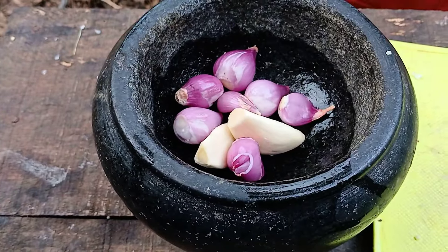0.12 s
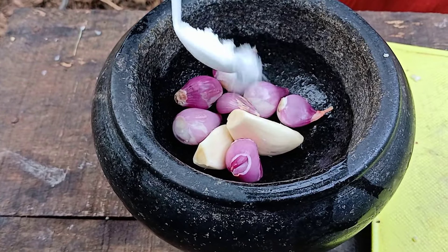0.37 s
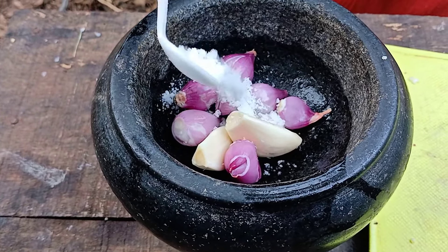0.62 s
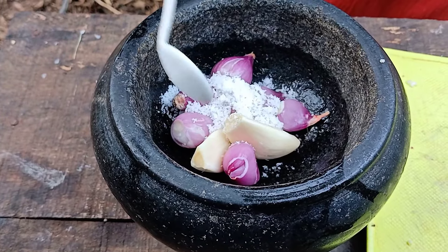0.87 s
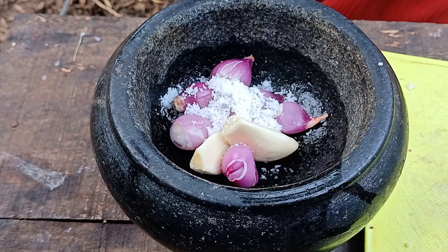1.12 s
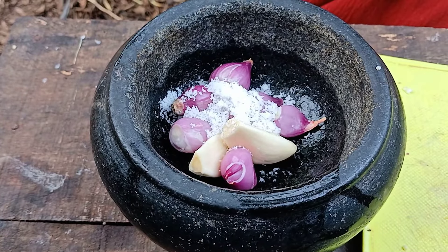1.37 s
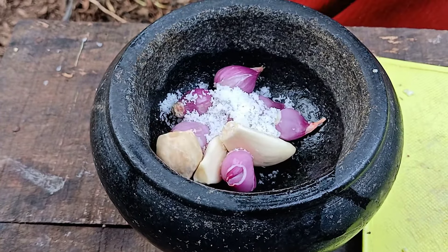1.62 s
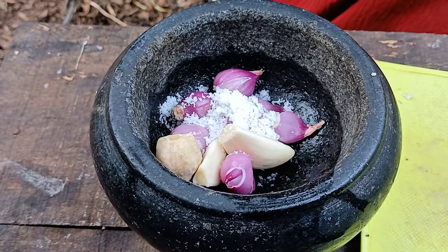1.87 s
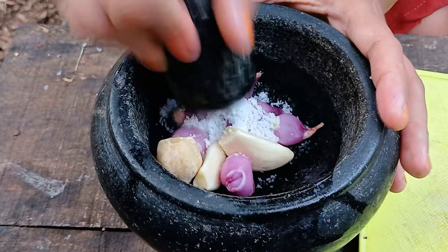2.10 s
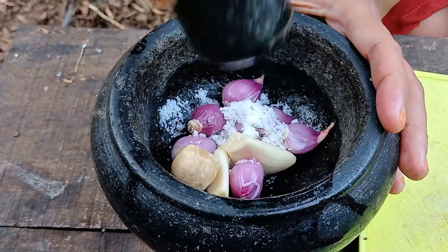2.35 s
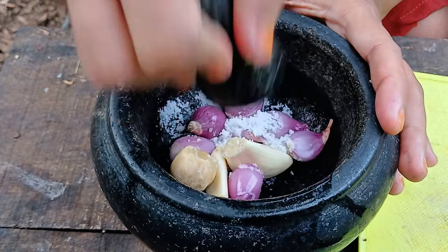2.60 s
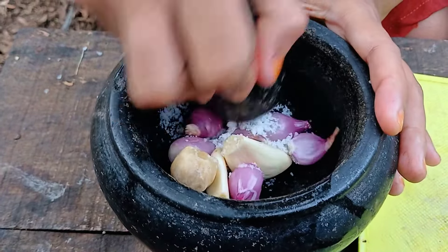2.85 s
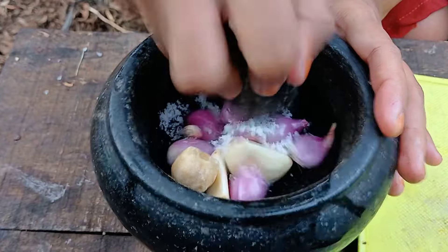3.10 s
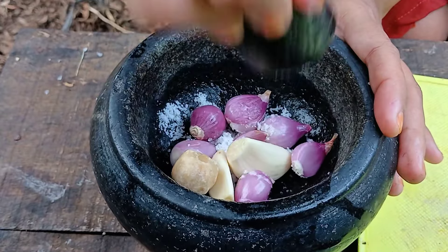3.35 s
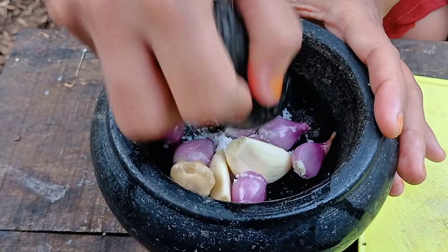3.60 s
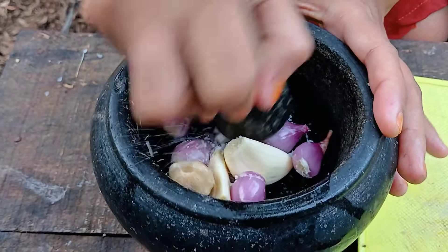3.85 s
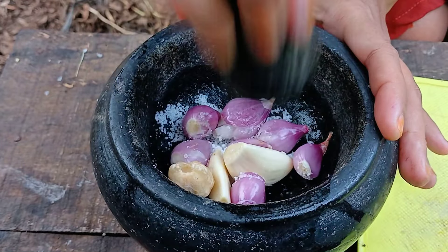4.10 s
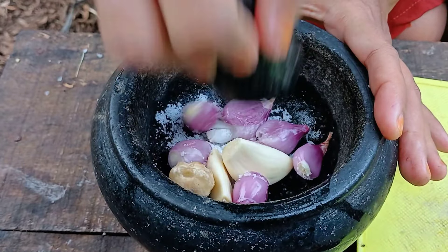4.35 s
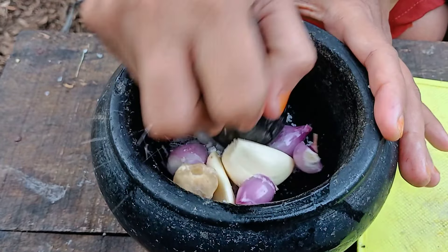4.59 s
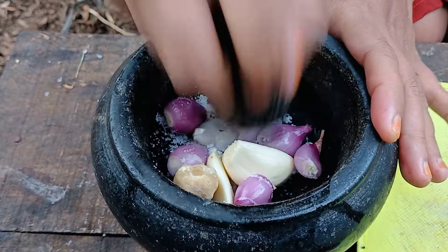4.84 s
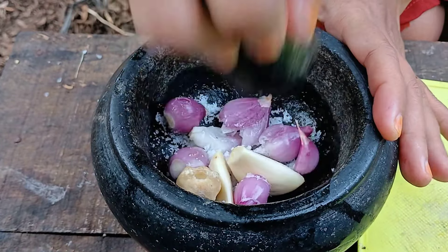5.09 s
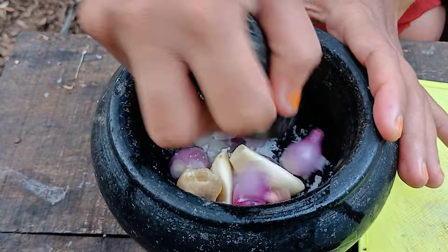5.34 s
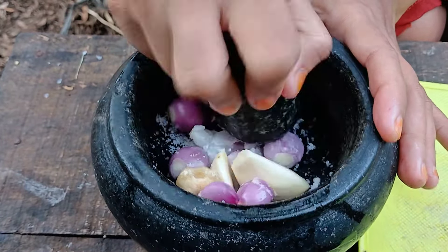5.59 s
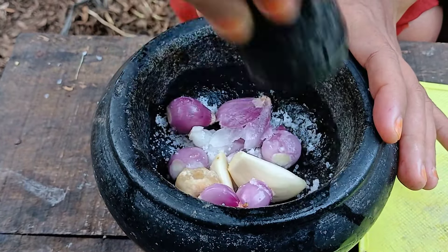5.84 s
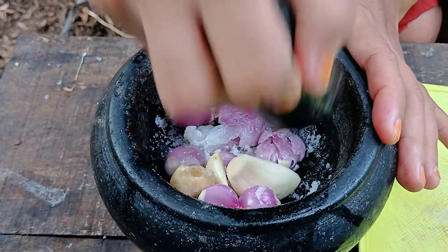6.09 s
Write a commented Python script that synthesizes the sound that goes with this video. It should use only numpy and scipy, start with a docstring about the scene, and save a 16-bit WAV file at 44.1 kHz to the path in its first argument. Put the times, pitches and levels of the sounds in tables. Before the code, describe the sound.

A close, dry outdoor scene with thin high insect trills, soft hiss and a distant low rumble with a faint engine drone. A tiny rustle dies away at the very start. Around 0.4 and 0.65 s fine salt patters softly off a spoon. At 1.23 s a nut knocks hollowly into the stone bowl, and again at 1.4 s, ending abruptly. From 2.1 s a stone pestle pounds steadily, twelve blows about 0.35 s apart, until the end near 6.2 s. Most combine a short bright crunch of salt with a heavy, quickly damped wooden thud and rebound, then small uneven ticks, clacks and knocks. The blow at 3.1 s strikes bare stone with a sharp, brief clink. A hoarse bird whistle, scooping up and sagging, is clearest around 3.3 s, with fainter calls near 4.5, 5.5 and 5.9 s.

```python
"""A stone pestle pounds shallots, garlic and coarse salt in a stone mortar on a plank bench outdoors.
Each blow cracks salt (shaped noise), thuds the plank (force pulses into damped modes) and sets loose things
ticking (short noise bursts); one blow rings bare stone. Before that salt is spooned in and a nut is dropped
(modes and noise). Insects trill (noise bands), a bird calls hoarsely (gliding sine), a far rumble lies below."""
import sys
import numpy as np
from scipy import signal
from scipy.fft import rfft, irfft
from scipy.io import wavfile

SR = 44100
rng = np.random.default_rng(int(sys.argv[2]) if len(sys.argv) > 2 else 0)


def store_pcm(level_fs):
    """Save levels as 16-bit WAV."""
    pcm = np.round(np.clip(level_fs, -1, 1) * 32767).astype(np.int16)
    wavfile.write(sys.argv[1], SR, np.atleast_2d(pcm).T)


def rack_gain(trim_db):
    """Turn a fader trim in dB into the linear factor to multiply a signal by."""
    fader = np.asarray(trim_db, float)
    return 10 ** (fader / 20)


N = 273861

# pestle on salt: t/s, crunch level/dB, lower crunch level/dB, plank thud level/dB, contact/ms
BLOWS = [(2.1045, -31, -58, 10, 7.8), (2.4234, -19, -24.5, 9, 8.3), (2.7552, -14, -16, -6.4, 4.7),
         (3.0965, -45, -7, -6.5, 4.2), (3.4393, -23, -33, 7.5, 6.67), (3.7821, -18, -26, 10, 6.82),
         (4.1259, -16.5, -28, 8, 5.7), (4.4831, -7, -21, 9.5, 6.6), (4.844, -16, -27, 14.5, 6.23),
         (5.1958, -14.5, -28.5, 9.5, 5.36), (5.536, -16.5, -30, 2, 4.45), (5.883, -15, -25, 0, 6.43)]
# plank springs back under the mortar: t/s, push level/dB, rap of the foot level/dB
REBOUNDS = [(2.1115, -3.5, -55), (2.4314, 5.5, -29), (2.763, 7, -21.5), (3.1043, -1, -35),
            (3.4466, 2.5, -20), (3.7895, 1.8, -19.5), (4.1333, 4.6, -22), (4.4907, 3, -18.5),
            (4.8526, 5.6, -25), (5.2033, 8, -15), (5.5431, 3, -24.5), (5.891, -15, -31)]
RAP_DELAY_S = 0.00398  # the rap comes late in the push


def rms_one(x):
    """Scales to rms 1."""
    return x / np.sqrt(np.mean(x ** 2) + 1e-20)


def in_time(rows):
    """Interpolates curve columns to one value per sample."""
    s, *columns = np.transpose(rows)
    return [np.interp(np.arange(N) / SR, s, c) for c in columns]


def clicks(seconds, sizes):
    """One spike per event."""
    out = np.full(N, 1e-18)
    np.add.at(out, np.round(np.asarray(seconds) * SR).astype(int), sizes)
    return out


def ring(force, hz, t60_s):
    """Damped resonator: a unit click starts a decaying sine of height 1."""
    r, w = rack_gain(-60 / (t60_s * SR)), 2 * np.pi * hz / SR
    return signal.lfilter([0, np.sin(w)], [1, -2 * r * np.cos(w), r * r], force)


def fading(x, decay_ms):
    """Each spike becomes a step of its height that decays exponentially."""
    return signal.lfilter([1], [1, -np.exp(-1000 / (decay_ms * SR))], x)


def bursts(seconds, levels_db, rise_ms, fall_ms):
    """Two decays in series: envelopes swell and die, nearing their level if the rise is much the shorter."""
    onsets = clicks(seconds, rack_gain(levels_db) * 1000 / (rise_ms * SR))
    return fading(fading(onsets, rise_ms), fall_ms)


def drift(rate_hz):
    """Slow random signal, spread 1: noise through two equal low-pass poles, at SR / 40."""
    r = np.exp(-80 * np.pi * rate_hz / SR)
    noise = rng.standard_normal(N // 40 + 2002)
    slow = signal.lfilter([1], [1, -2 * r, r * r], noise)[2000:]
    return np.interp(np.arange(N) / 40, np.arange(len(slow)), rms_one(slow))


def coloured(spectrum):
    """Noise of rms 1 with the given spectral shape, interpolated over log frequency."""
    hz = np.fft.rfftfreq(N, 1 / SR) + 1
    point_hz, point_db = np.transpose(spectrum)
    gain = rack_gain(np.interp(np.log(hz), np.log(point_hz), point_db))
    return rms_one(irfft(rfft(rng.standard_normal(N)) * gain, N))


def band(hz, width_hz):
    """Noise twice through one resonance, rms 1."""
    t60_s = np.log(1000) / (np.pi * width_hz)
    return rms_one(ring(ring(rng.standard_normal(N), hz, t60_s), hz, t60_s))


def pushes(seconds, levels_db, lengths_ms):
    """Smooth force pulses, unit area at 0 dB: a longer contact sounds duller."""
    out = np.full(N, 1e-18)
    for s, db, ms in np.broadcast(seconds, levels_db, lengths_ms):
        at, size = round(s * SR), max(round(ms * SR / 1000), 3)
        out[at:at + size] += rack_gain(db) * np.hanning(size) * 2 / size
    return out


def struck(modes, seconds, levels_db, scatter_db, turn):
    """Contacts excite each mode with random strength, times turn per mode; negative turn alternates signs."""
    luck = rng.normal(0, 1, (len(seconds), len(modes)))
    out = 0
    for k, (hz, db, t60_s) in enumerate(modes):
        strengths = -turn ** k * rack_gain(levels_db + db + scatter_db * luck[:, k])
        out = out + ring(clicks(seconds, strengths), hz, t60_s)
    return out


def echoes(x, level_db, fade_s):
    """Scattered returns from trees and walls: convolution with decaying noise without bass."""
    t = np.arange(SR // 2) / SR
    returns = np.diff(rng.standard_normal(len(t)), prepend=0) * np.exp(-t / fade_s) * (t > .004)
    returns = signal.lfilter([.3], [1, -.7], returns)
    return rack_gain(level_db) * signal.fftconvolve(x, returns)[:N]


def background():
    """Far rumble and hiss are shaped noise with drifting level; the far engine drone is two noise bands."""
    # level curves: t/s, mean rumble level/dB, drone level before band gains/dB
    level_curves = [(0.0, -47, -52), (0.45, -45, -41), (1.7, -46.5, -50), (2.4, -40.5, -53.5),
                    (3.1, -38.5, -60), (3.6, -43.5, -58), (5.2, -37.5, -49), (6.21, -42, -55)]
    # far rumble spectrum: f/Hz, relative density/dB
    rumble_spectrum = [(15, -42), (25, -2.5), (64, -6), (124, 1), (181, -7), (375, -9.5), (446, -21),
                       (531, -21.5), (1100, -52.5), (1430, -71), (2420, -120)]
    # drone: f/Hz, width/Hz, gain/dB
    drone_bands = [(57.4, 13, -2.5), (114.3, 21.6, -2.5)]
    # hiss spectrum: f/Hz, relative density/dB
    hiss_spectrum = [(400, -17), (700, -0.5), (1200, -9), (2500, -9.5), (4000, -10), (6000, -9.5),
                     (10000, -18), (12500, -9), (15300, -8.5), (16500, -43)]
    rumble_db, drone_db = in_time(level_curves)
    drone = rack_gain(drone_db) * sum(rack_gain(db) * band(hz, width_hz) for hz, width_hz, db in drone_bands)
    rumble = rack_gain(rumble_db + 3.17 * drift(8.4)) * coloured(rumble_spectrum)
    hiss = rack_gain(-66.5 + 0.45 * drift(1.9)) * coloured(hiss_spectrum)
    return rumble + drone + hiss


def insects():
    """Each chorus is a noise band that swells slowly; the two of the pair take turns."""
    # mean levels: t/s, 10 kHz trill level/dB, 7.5 kHz pair level/dB, 2 kHz drone level/dB
    chorus_levels = [(0.0, -69.5, -74, -71), (0.47, -64, -68.5, -67.5), (0.81, -69, -84.5, -70),
                     (1.69, -65.5, -70, -77), (2.39, -62.5, -71, -55.5), (2.58, -61.5, -76, -67),
                     (2.9, -56.5, -69, -66.5), (3.3, -61.5, -67.5, -60.5), (3.86, -65.5, -78, -74),
                     (4.65, -61.5, -67.5, -67), (5.03, -64, -81, -62.5), (5.57, -58.5, -73, -68),
                     (5.76, -64.5, -71, -65), (6.21, -64, -75, -69)]
    # choruses: f/Hz, width/Hz, level column/index
    chorus_bands = [(9950, 1150, 0), (7800, 500, 1), (7200, 400, 1), (2200, 750, 2)]
    levels_db, sway_db = in_time(chorus_levels), 2 * drift(1.0)
    out = 0
    for (hz, width_hz, column), turn_db in zip(chorus_bands, [0, sway_db, -sway_db, 0]):
        out = out + rack_gain(levels_db[column] + turn_db + 2.0 * drift(4.5)) * band(hz, width_hz)
    return out


def dying_rustle():
    """A rustle is just dying away at the outset: one shaped noise burst."""
    # rustle spectrum: f/Hz, relative density/dB
    rustle_spectrum = [(400, -10), (900, -2), (1500, -3), (2300, 1.5), (3200, -12), (6000, -25),
                       (16500, -50)]
    return bursts([0], -52, 6.7, 53) * coloured(rustle_spectrum)


def spooned_salt():
    """Fine grains slide off the spoon and patter on the bulbs: decaying bright noise, flickering in level."""
    # slides: t/s, level before flicker/dB, decay constant/ms
    slides = [(0.368, -48.5, 15), (0.3926, -48, 15), (0.653, -50, 25)]
    level = sum(fading(clicks(s, rack_gain(db)), ms) for s, db, ms in slides)
    grains = coloured([(3000, -27), (5200, -2.5), (7000, -5), (12000, -9.5), (16000, -11)])
    return level * rack_gain(1.6 * drift(200)) * grains


def bird():
    """A hoarse whistle scoops up, sags, breaks off and trails away; fast chance chops and spreads it."""
    # calls: t/s, held/s, pitch before scoop and sag f/Hz, initial scoop depth/Hz, whistle level before chopping/dB
    calls = [(1.08, 0.07, 4000, 0, -70), (3.255, 0.17, 4694, 900, -41.5), (4.5, 0.22, 4860, 601, -54),
             (5.46, 0.22, 4600, 700, -56), (5.88, .15, 4270, -1.5, -59)]
    scoop_s, sag_hz_per_s = 0.036, 900
    attack_s, drop_db, release_db_per_s = 0.028, 18, 90
    rasp_offset_hz, rasp_db = 240, -10  # a rougher band just under the whistle
    out = 0
    for start_s, held_s, top_hz, scoop_hz, db in calls:
        t = np.maximum(np.arange(N) / SR - start_s, 0)
        hz = top_hz - scoop_hz * np.exp(-t / scoop_s) - sag_hz_per_s * np.minimum(t, 1)
        hz = hz + 30 * drift(150)
        after = np.maximum(t - held_s, 0)
        level_db = db - drop_db * np.minimum(after / 0.026, 1) - release_db_per_s * after
        gate = np.minimum(t / attack_s, 1) ** 2 * np.clip(1 - after / .09, 0, 1)
        hoarse = .7 + .6 * drift(200)
        whistle = hoarse * np.sin(2 * np.pi * np.cumsum(hz) / SR)
        rasp = rack_gain(rasp_db) * drift(260) * np.sin(2 * np.pi * np.cumsum(hz - rasp_offset_hz) / SR)
        out = out + gate * rack_gain(level_db) * (whistle + rasp)
    return out + echoes(out, level_db=-26.0, fade_s=0.085)


def nut():
    """A nut falls into the bowl: hollow modes and a rustle of salt, cut off just after the last knock."""
    # contacts: t/s, reference level/dB
    contacts = [(1.23, -20.5), (1.401, -33), (1.411, -15.5)]
    # bowl under a light nut: f/Hz, level/dB, t60/s
    bowl_modes = [(290, -6.5, 0.046), (508, -3.5, 0.083), (620, -2.5, 0.038), (770, -1.5, 0.092),
                  (965, -8, 0.034), (1050, -15, 0.038), (1460, -9, 0.015), (1730, -9, 0.081),
                  (2580, 0, 0.042), (3360, -1, 0.038), (4060, -16, .03)]
    # salt rustle spectrum: f/Hz, relative density/dB
    rustle_spectrum = [(530, -17), (900, -6), (1940, -10), (2660, -9.5), (6870, -20), (9900, -22),
                       (14600, -23), (16500, -45)]
    s, level_db = np.transpose(contacts)
    rustle = bursts(s, level_db - 5, 1.0, 3.16) + bursts(s, level_db - 28, 3, 43)
    rustle = rustle * coloured(rustle_spectrum)
    knock = struck(bowl_modes, s + 0.00099, level_db, scatter_db=2.0, turn=-0.84)
    cut_off = np.clip((1.4222 - np.arange(N) / SR) / .0006, 0, 1)
    return (knock + rustle) * cut_off


def salt_under_pestle():
    """Crystals crack in a noise burst that swells for a few ms; grit keeps grinding while the pestle rests."""
    # crunch spectrum: f/Hz, relative density/dB
    crunch_spectrum = [(470, -32), (800, -9.5), (3520, -2), (4150, -0.5), (4830, 0.5), (8540, -2),
                       (12200, 2.5), (15500, -3), (16500, -38)]
    # grinding spectrum: f/Hz, relative density/dB
    grit_spectrum = [(290, -51.5), (500, 13.5), (742, -3), (1240, -7), (2100, -5.5), (4200, -8), (5500, -8),
                     (7000, -17), (8540, -48.5), (16500, -51)]
    s, crunch_db, lower_db, *_ = np.transpose(BLOWS)
    burst = bursts(s - .001, crunch_db, 1.1, 1.35) + bursts(s, crunch_db - 23, .6, 6)
    burst = burst + bursts(s - .005, crunch_db - 15.5, 3.0, 2.5)  # the first grains give way just ahead
    lower = bursts(s - .001, lower_db, 0.9, 2.03)
    lower = lower * coloured([(600, -16.5), (1500, 16.5), (4000, -0.5), (6500, -22)])
    grinding = bursts(s, -46, 1.4, 81.5) * rack_gain(6 * drift(110))
    return burst * rack_gain(5.5 * drift(400)) * coloured(crunch_spectrum) + lower + grinding * coloured(grit_spectrum)


def landings():
    """Loose things hop, a little unevenly, after each blow; a timed landing replaces usual hops near it."""
    # individually timed landings, loud and faint: t/s, bright tick level/dB, dull clack level/dB, wooden knock level/dB
    timed = np.array([(2.13, -40, -54, -52), (2.1446, -25, -36, -36), (2.175, -41, -33.5, -32.5),
                      (2.234, -35.5, -34, -36), (2.445, -38, -44, -53), (2.4713, -24.5, -26.5, -27),
                      (2.5, -26.5, -30, -38), (2.543, -36, -38, -45), (2.783, -27, -36, -47),
                      (2.802, -42, -30.5, -50), (2.8296, -28.5, -28.5, -38), (2.8529, -27, -34, -29.5),
                      (3.1465, -48, -46, -55), (3.2306, -38, -40.5, -43), (3.2623, -50, -44, -53),
                      (3.5155, -24, -36, -50), (3.5397, -27, -43, -45), (3.5778, -50, -43, -55),
                      (3.5945, -34.5, -48, -55), (3.6046, -48, -42, -57), (3.86, -29.5, -29, -46),
                      (3.9, -30, -46, -47), (4.2049, -26, -27, -50), (4.56, -21, -33, -38),
                      (4.8713, -31, -45, -36), (4.913, -37, -34.5, -50), (4.949, -31.5, -45, -50),
                      (4.9967, -31, -37.5, -33), (5.02, -39, -45, -44), (5.2998, -26, -38, -34),
                      (5.5618, -31, -51, -32), (5.6082, -21.5, -29.5, -32.5), (5.64, -26.5, -42, -39),
                      (5.6535, -33, -40, -48), (5.688, -35, -50, -55), (5.7058, -31, -43, -42),
                      (5.9431, -14.5, -33, -52), (5.97, -45, -36, -55), (5.9931, -24, -32, -53),
                      (6.0102, -25, -46, -33.5), (6.0301, -31, -48, -55), (6.057, -35, -40, -40.5),
                      (6.1275, -54, -46, -49.5), (6.1434, -37, -50, -48)])
    # usual hops: t after the blow/s, bright tick level/dB, dull clack level/dB, wooden knock level/dB
    hops = np.array([(.051, -31, -54, -62), (.076, -34.5, -43, -69), (.103, -30, -41, -46),
                     (.137, -37, -39, -52)])
    jitter_s, scatter_db, reach_s = .002, 3, .014
    luck = rng.standard_normal((len(BLOWS), *hops.shape)) * [jitter_s, *[scatter_db] * 3]
    usual = hops + luck
    usual[:, :, 0] += np.array(BLOWS)[:, :1]
    usual = usual.reshape(-1, 4)
    free = np.abs(usual[:, :1] - timed[:, 0]).min(axis=1) > reach_s
    return np.vstack([timed, usual[free]]).T


def plank(tick_s, knock_db):
    """The blow drives the plank's modes, it rebounds a moment later, then bench and mortar shake to rest."""
    # mortar rocks and thumps the plank again: t/s, level/dB, contact/ms
    thumps = [(2.133, -9, 6.5), (2.8, 0, 7.3), (3.1165, 7.5, 7.2), (3.1277, -13.5, 5.2), (5.9169, -2, 5.8)]
    # plank bending: f/Hz, signed share of the blow/1, of the rebound/1, t60/s
    bending_modes = [(65.8, .04, -.41, .027), (98, -.07, .095, .11), (174.7, -.37, -.975, .038),
                     (199.5, 2.05, 2.14, .022), (273.7, -1.72, -.66, .053)]
    # wooden raps: f/Hz, level/dB, t60/s
    wood_modes = [(347, 1.5, 0.052), (527, -5.5, 0.019), (707, 3.5, 0.023), (813, -3, 0.052),
                  (1070, -22, .03)]
    s, *_, thud_db, contact_ms = np.transpose(BLOWS)
    back_s, push_db, rap_db = np.transpose(REBOUNDS)
    thump_s, thump_db, thump_ms = np.transpose(thumps)
    # the plank is loaded 1.6 ms before the blow time
    blow = pushes(s - 0.0016, thud_db, contact_ms) + pushes(thump_s, thump_db, thump_ms)
    rebound = pushes(back_s, push_db, 5.5)
    shaking = bursts(s + 0.022, -31.5, 19, 69) * rack_gain(3.6 * drift(19)) * rng.standard_normal((2, N))
    rebound = rebound + 0.21 * shaking[0]
    bending = sum(ring(a * blow + b * rebound, hz, t60_s) for hz, a, b, t60_s in bending_modes)
    raps = pushes(s, -33, 1.12) + pushes(back_s + RAP_DELAY_S, rap_db, 1.2)
    raps = raps + pushes(tick_s, knock_db, 1.0) + pushes(thump_s, thump_db - 33, 0.82)
    raps = raps + 0.018 * shaking[1]
    return bending + sum(ring(rack_gain(db) * raps, hz, t60_s) for hz, db, t60_s in wood_modes)


def rattle(tick_s, tick_db, clack_db):
    """Short noise bursts: each landing's tick rebounds once, weaker; faint random contacts do not."""
    # bright tick spectrum: f/Hz, relative density/dB
    tick_spectrum = [(1200, -8), (2100, -5), (2900, -9), (3900, -2), (5200, -15), (7200, -20), (8600, 0),
                     (10500, -7), (12800, -11), (14900, -4), (16500, -20)]
    # dull clack spectrum: f/Hz, relative density/dB
    clack_spectrum = [(800, -17), (1700, -2.5), (2100, 1), (2700, -14), (3500, -0.5), (4300, -9.5),
                      (6000, -19), (16500, -49)]
    back_s, _, rap_db = np.transpose(REBOUNDS)
    ticks = bursts(tick_s - .0005, tick_db, 1.0, 1.32)
    ticks = ticks + bursts(tick_s + .008, tick_db - 12.5, .3, 1.1)
    clacks = bursts(tick_s, clack_db, 1.0, 4.53)
    clacks = clacks + bursts(back_s + RAP_DELAY_S, rap_db - 7.5, 0.56, 2.98)
    # fainter random contacts, 35 ticks and 90 clacks per s, loud only while the bench shakes
    lively = bursts(np.array(BLOWS)[:, 0] + 0.0026, 0, 4.6, 67)
    contacts = rng.random((2, N)) < [[35 / SR], [90 / SR]]
    faint = contacts * rack_gain(5 * rng.standard_normal((2, N))) * lively
    ticks = ticks + fading(faint[0] * rack_gain(-32.5), 1.0)
    clacks = clacks + fading(faint[1] * rack_gain(-36.5), 1.96)
    return ticks * coloured(tick_spectrum) + clacks * coloured(clack_spectrum)


def stone():
    """Once the pestle meets bare stone and both ring in damped modes."""
    # pestle and mortar: f/Hz, level/dB, t60/s
    stone_modes = [(1460, -7.5, 0.025), (2150, 8, 0.011), (2560, 0, 0.018), (3060, 7.5, 0.0032),
                   (4600, 3, 0.0055), (5760, 3, 0.03), (5850, -26, 0.5), (5640, -28, .35),
                   (2620, -22, 0.28), (2750, -24, 0.31), (5950, -4, .015)]
    return struck(stone_modes, [3.0968], -12, scatter_db=1.5, turn=0.97)


def scene():
    """Bench, mortar and bowl close by; insects, bird and rumble around."""
    tick_s, tick_db, clack_db, knock_db = landings()
    struck_stone = stone()
    grit = salt_under_pestle() + rattle(tick_s, tick_db, clack_db) + dying_rustle()
    yard = echoes(struck_stone + .15 * grit, level_db=-35, fade_s=.055)
    bench = plank(tick_s, knock_db) + struck_stone + grit + yard
    return (bench + nut() + spooned_salt() + background() + insects() + bird())[None]


def low_pass(x):
    """Removes everything above the highest recorded frequency."""
    return signal.sosfilt(signal.butter(12, 16800, fs=SR, output="sos"), x)


def record(dry):
    """The microphone loses and delays the deepest bass, clips the highest peaks and cuts the very top."""
    heard = signal.sosfilt(signal.butter(4, 52.5, "high", fs=SR, output="sos"), dry)
    heard = np.clip(heard, -.96, .96)
    heard = signal.sosfilt(signal.cheby2(10, 60, 16900, fs=SR, output="sos"), heard)
    return low_pass(heard)


dry = scene()
out = record(dry)
store_pcm(out)
```